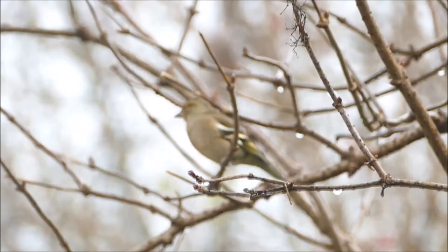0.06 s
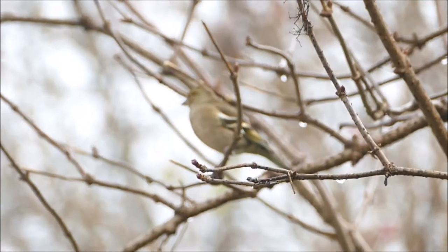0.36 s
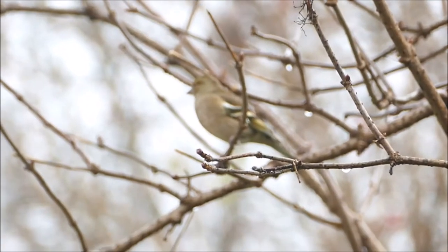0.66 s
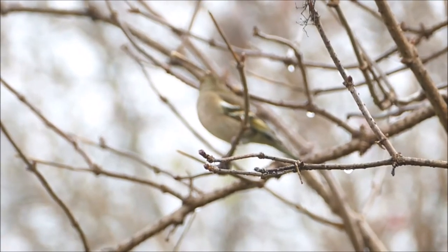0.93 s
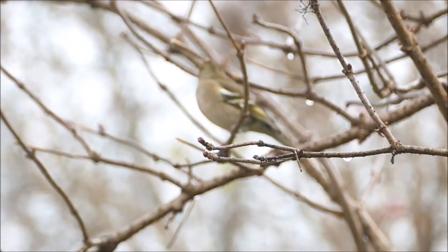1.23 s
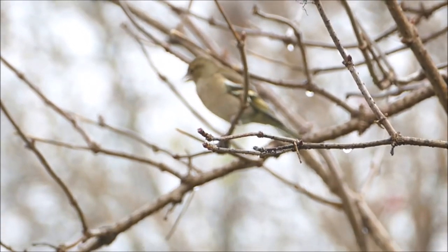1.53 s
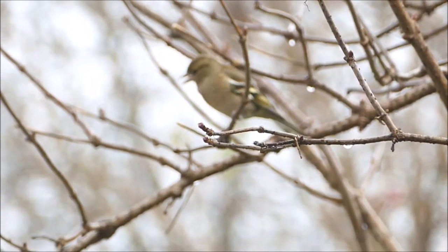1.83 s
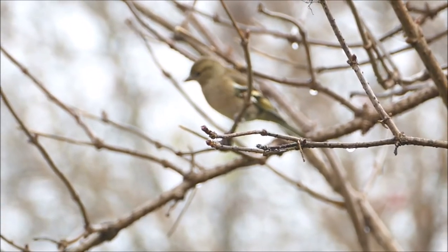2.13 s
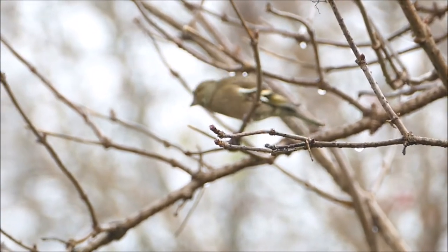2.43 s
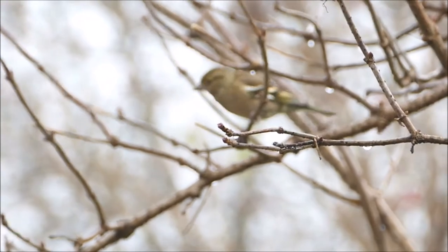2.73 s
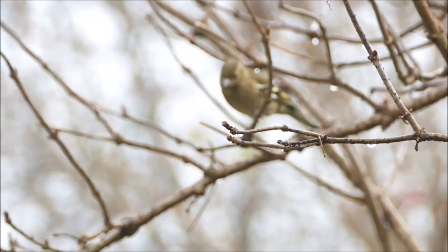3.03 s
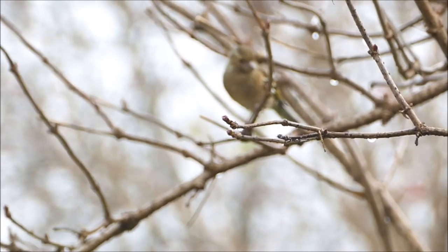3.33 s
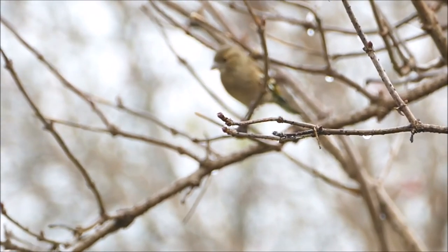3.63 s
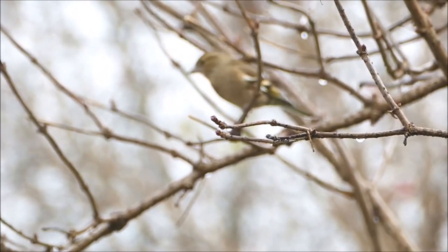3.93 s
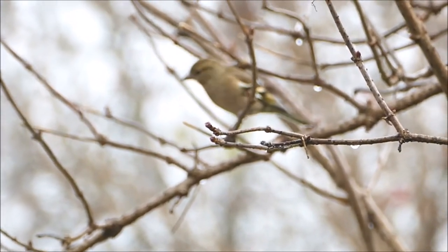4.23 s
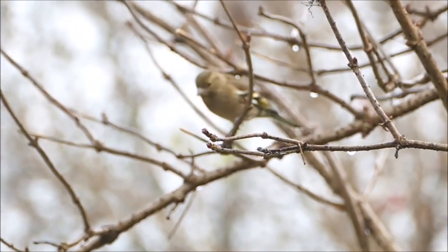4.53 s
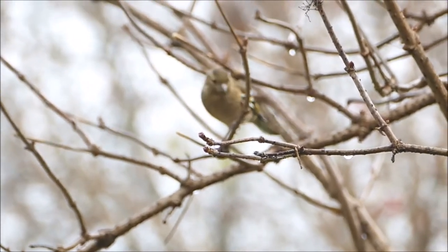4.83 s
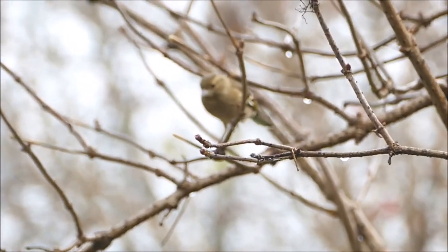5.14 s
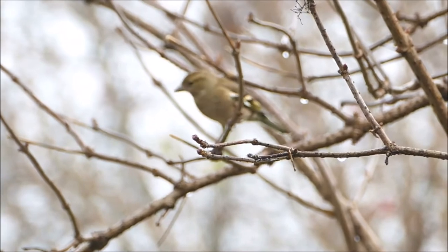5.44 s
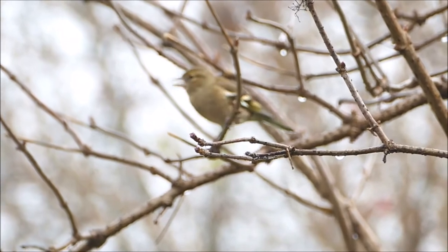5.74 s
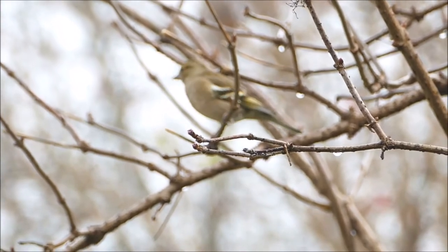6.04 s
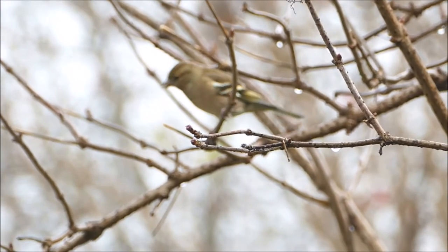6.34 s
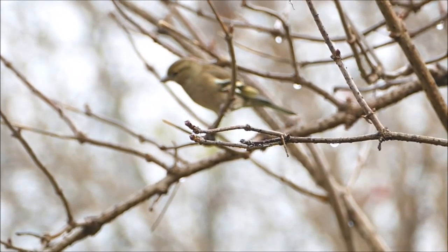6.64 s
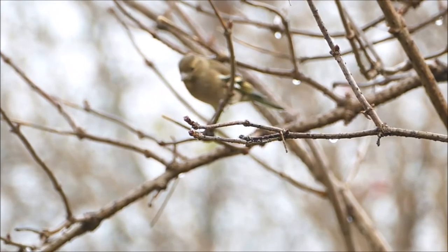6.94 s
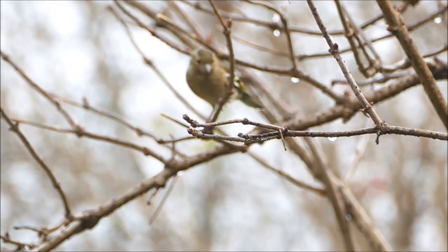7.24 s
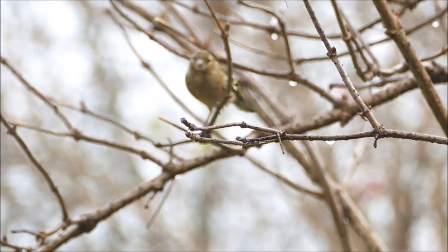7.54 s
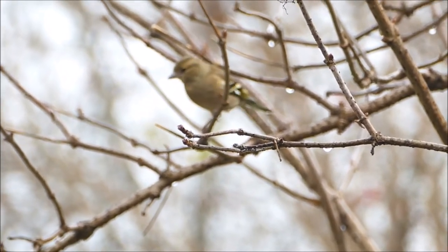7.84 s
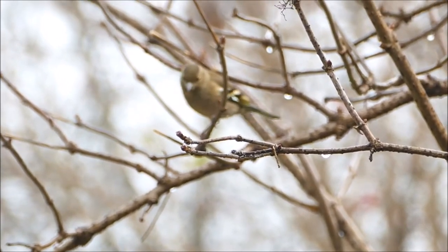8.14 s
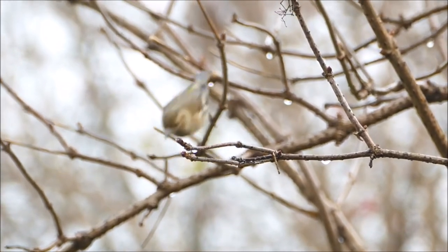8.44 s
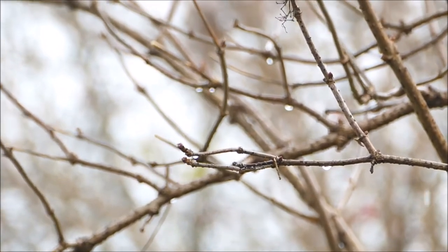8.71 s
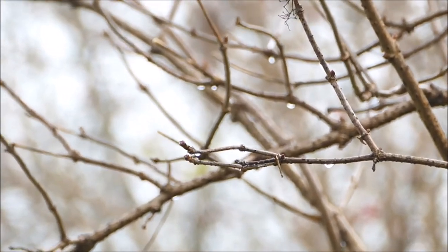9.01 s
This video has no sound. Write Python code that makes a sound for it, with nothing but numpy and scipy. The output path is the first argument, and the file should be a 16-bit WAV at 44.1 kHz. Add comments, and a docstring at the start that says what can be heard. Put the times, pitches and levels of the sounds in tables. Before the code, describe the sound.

After a brief silence, quiet garden ambience cuts in at about 0.3 seconds: distant traffic rumble, a low engine hum and soft microphone hiss, with a faint tone that dies away at once. A nearby finch gives four pairs of short, sharp calls, at roughly 1.7, 3.7, 5.6 and 7.8 seconds, the two notes about a quarter second apart. Each note begins with a rasp and sweeps up into a clear, high whistle with a slight echo. These are by far the loudest sounds. Distant birds chirp faintly in between, around 0.9, 3.1, 5, 6.3, 7.3 and 8.2 seconds. A few water drops tick softly on twigs, near 5 and 6 seconds, in a small cluster around 7, and once more near 8.8. The traffic swells gently now and then and continues to the end.

```python
"""A chaffinch on a bare, wet twig gives four pairs of sharp "pink" calls: in each note its syrinx
starts on a rasp, sweeps up and locks into a clear whistle, shaped by the throat and open beak.
Branches and walls scatter the notes; small birds chirp far off and a few drops tick on the twigs.
Underneath sits a bed of distant traffic, a low engine hum and microphone hiss, with a faint tone
dying away at the start. Loud notes duck the whole mix, which then creeps back up."""
import sys
import numpy as np
from scipy import signal
from scipy.fft import rfft, irfft, next_fast_len
from scipy.io import wavfile
from scipy.ndimage import uniform_filter1d

SR = 44100
rng = np.random.default_rng(int(sys.argv[2]) if len(sys.argv) > 2 else 0)


def unload_audio(sound):
    """Save the sound as a 16-bit wav file, at the path given as the first command line argument."""
    columns = np.transpose(np.atleast_2d(sound))
    # keep every value between -1 and 1, then stretch to whole-number steps
    steps = np.round(np.clip(columns, -1, 1) * 32767)
    wavfile.write(sys.argv[1], SR, steps.astype(np.int16))


N = 399987
T = np.arange(N) / SR

# chaffinch notes, levels before the throat: flip t/s, held f/Hz, drift/(Hz/s), rasp length/s,
# rasp level/dB, accent level/dB, held level/dB, half-pitch mode/dB re rasp, overtones/dB re rasp
PINK_NOTES = [(1.693, 4500, -1800, 0.049, -22.5, -19.5, -22, 4, -7),
              (1.97, 4304, 298, 0.047, -29, -17.5, -21, 8.5, 1.5),
              (3.702, 4370, -1400, 0.048, -22.5, -11.5, -23, 6.5, -7.5),
              (3.9536, 4444, 900, 0.048, -23.5, -17.5, -21, 3.5, 1.5),
              (5.606, 4355, -1200, 0.053, -22, -13.5, -21.5, 5, -4),
              (5.8664, 4328, 1500, 0.051, -23, -22.5, -22, 3.5, -1),
              (7.786, 4396, -1800, 0.051, -21, -12.5, -22, 5.5, -5.5),
              (8.012, 4470, 0, 0.046, -20, -16, -20.5, 3.5, -5)]
# tone colour of the throat and open beak: f/Hz, gain/dB
THROAT_EQ = [(1400, -48), (1800, -16.5), (2300, -14.5), (2850, -9.5), (3600, -3.5), (4350, -6.5),
             (4700, -12.5), (5700, -7), (7000, -11.5), (9000, -21.5), (12500, -33), (14500, -56)]
# sizzle of the beak: f/Hz, relative level/dB
SIZZLE_EQ = [(6000, -10), (9000, -2.5), (12500, 2), (13300, -27), (14200, -17)]
# far chirps: t/s, length/s, start f/Hz, middle f/Hz, end f/Hz, level/dB
FAR_CHIRPS = [(0.909, 0.075, 4300, 3410, 3040, -47), (3.102, 0.077, 4300, 3400, 2490, -45),
              (4.635, 0.019, 3600, 3430, 3180, -51), (4.952, 0.067, 3480, 3720, 3680, -57),
              (5.007, 0.042, 3890, 3360, 2960, -41.5), (6.287, 0.024, 3220, 3460, 4100, -41.5),
              (6.303, 0.023, 3600, 4600, 5200, -46), (6.329, 0.049, 4700, 5650, 6540, -50.5),
              (6.387, 0.04, 3020, 3750, 3890, -41.5), (7.295, 0.06, 4000, 3344, 2870, -44),
              (7.516, 0.03, 2690, 2270, 2250, -57), (8.212, 0.068, 3480, 3190, 3150, -44.5),
              (8.213, 0.03, 2580, 2230, 2100, -49.5)]
# drops: t/s, knock f/Hz, knock width/Hz, knock level/dB, splash f/Hz, splash level/dB,
# thud level/dB, decay/s
DROP_HITS = [(1.875, 3000, 1500, -70, 9000, -49, -75, 0.01), (2.613, 3000, 1500, -70, 7950, -52, -75, 0.01),
             (5.135, 3280, 1500, -50, 6500, -55.5, -50, 0.025),
             (5.953, 3500, 1500, -58, 8900, -40, -72, 0.023),
             (6.891, 2480, 1010, -36, 9850, -41.5, -70, 0.017),
             (6.995, 3220, 1500, -50.5, 10100, -42.5, -63, 0.014),
             (7.133, 2490, 3180, -41, 7000, -52, -43.5, 0.026),
             (8.843, 3300, 1510, -48.5, 8500, -54, -65, 0.017)]
# distant traffic: f/Hz, relative level/dB
TRAFFIC_EQ = [(15, 1), (26, 5), (45, -8), (75, 1), (100, -5.5), (150, -6), (300, -5.5), (600, -8),
              (950, -9), (1400, -16.5), (2200, -24), (4000, -32.5)]
# swells of the traffic rumble: start t/s, end t/s, rise/dB
RUMBLE_SWELLS = [(2.25, 2.45, 4.5), (4.0, 4.2, 5), (6.35, 6.7, 6), (7.85, 8.4, 5)]
# the engine labours and its octave stands out: start t/s, end t/s, rise/dB
ENGINE_LABOUR = [(4.7, 6.05, 10)]
# blur of very distant birds: f/Hz, relative level/dB
CHORUS_EQ = [(2000, -23), (2800, 15.5), (3450, 18), (3850, 18.5), (4200, -31.5), (6000, -52)]
# microphone hiss: f/Hz, relative level/dB
HISS_EQ = [(1000, 0.55), (4500, -0.46), (9000, 1.0), (15500, -2.5)]

START_S, TOP_HZ = 0.257, 15550  # opening silence, high cut
LEAD_S, FLIP_S, HOLD_S = 0.06, 0.0027, 0.049  # a note's run-up, flip softness and hold


def chaffinch():
    """The lead bird shifts on its twig, so every note finds other echoes."""
    out = np.zeros(N)
    for flip_at, *note in PINK_NOTES:
        add(out, flip_at - LEAD_S, garden(pink(*note)))
    return out


def pink(held_hz, drift_hz_per_s, rasp_s, rasp_db, accent_db, held_db, half_db, overtone_db,
         jitter=0.108, flutter=0.7, rolloff=1.64, waver_hz=22, second_db=-13.5, third_db=2,
         breath_db=-15, sizzle_db=-44):
    """One note: the syrinx rasps, every other cycle different, then locks into a clear whistle."""
    t = np.arange(-LEAD_S, 2 * HOLD_S, 1 / SR)
    hz = pink_pitch(t, held_hz + drift_hz_per_s * t + waver_hz * band(0, 120, len(t)))
    rasp, accent, held = pink_envelopes(t, rasp_s, rasp_db, accent_db, held_db)
    half = undb(half_db) * half_pitch_flare(t)
    bloom = held * step(t - 0.0065, FLIP_S)  # the whistle's harmonics open just after the flip
    whistle = {1: accent + held, 2: undb(second_db) * bloom, 3: undb(third_db) * bloom}
    rough = np.clip(-t / rasp_s, 0.085, 1)  # the voice clears as it climbs
    scratch = jitter * rough * undb(overtone_db / 2) * band(0, 1360, len(t))
    phase = 2 * np.pi * np.cumsum(hz * (1 + scratch)) / SR
    voice = 0
    for k in np.arange(2, 13) / 2:  # harmonics, with the half-pitch mode in between
        grit = rasp * (half if k % 1 else 1)
        if k >= 2:
            grit = grit * undb(overtone_db) * (2 / k) ** rolloff
        shake = 1 + flutter * rough * band(0, 1500, len(t))
        throat = response(THROAT_EQ, k * hz) * (k * hz < TOP_HZ)
        voice += (grit + whistle.get(k, 0)) * shake * throat * np.sin(k * phase)
    # turbulence at the syrinx passes through the same throat; a thin sizzle rides on the sweep
    breath = undb(breath_db + overtone_db) * rough * (rasp + accent + held) * coloured(THROAT_EQ, len(t))
    sizzle = undb(sizzle_db + overtone_db / 4) * np.sqrt(rasp + accent) * coloured(SIZZLE_EQ, len(t))
    return np.sqrt(2) * (voice + breath + sizzle)


def pink_pitch(t, held_hz, climb_to_hz=3200, climb_hz_per_s=36000, flip_hz=756, knee_hz=137):
    """The pitch climbs, flips into the upper register at t = 0 and rounds off into the held pitch."""
    sweep = climb_to_hz + climb_hz_per_s * t + flip_hz * step(t, FLIP_S)
    return held_hz - knee_hz * np.logaddexp(0, (held_hz - sweep) / knee_hz)


def pink_envelopes(t, rasp_s, rasp_db, accent_db, held_db,
                   attack_s=0.037, accent_s=0.008, release_db_per_s=480):
    """The rasp swells, the flip gets an accent, the whistle is held and let go."""
    flipped = step(t, FLIP_S)
    rasp = undb(rasp_db) * np.clip((t + rasp_s) / attack_s, 0, 1) ** 0.74 * (1 - flipped)
    accent = undb(accent_db) * np.exp(-(t / accent_s) ** 2)
    held = undb(held_db - release_db_per_s * np.maximum(t - HOLD_S, 0)) * flipped
    return rasp, accent, held


def half_pitch_flare(t, lead_s=0.025, width_s=0.0078, steady_share=0.17):
    """The syrinx's half-pitch mode runs through the rasp and flares shortly before the flip."""
    flare = np.exp(-((t + lead_s) / width_s) ** 2)
    return steady_share * (1 - step(t, FLIP_S)) + (1 - steady_share) * flare


def garden(x, twigs_db=-8, walls_db=-6, trees_db=-19, damp_hz=8000):
    """Direct sound, quick scatter from the branches, and a tail from walls and further trees."""
    twigs = undb(twigs_db) * echoes(0.047, 0.0057)
    walls = undb(walls_db) * echoes(0.52, 0.0037)
    trees = undb(trees_db) * echoes(0.5, 0.092)
    path = signal.sosfilt(signal.butter(1, damp_hz, fs=SR, output="sos"), twigs + walls + trees)
    path[0] += 1  # direct sound
    return signal.fftconvolve(x, path)


def far_birds(faint_db=-62, count=22):
    """Birds in the neighbouring trees, and fainter ones calling at random beyond them."""
    out = np.zeros(N)
    for start, length, *pitches, db in FAR_CHIRPS:
        add(out, start, undb(db) * far_chirp(length, pitches))
    for slot, (offset, pitch) in enumerate(rng.random((count, 2))):
        start = (slot + offset) / count * T[-1]
        hz = 3250 + 400 * pitch
        add(out, start, undb(faint_db) * far_chirp(0.19, [hz + 300, hz, hz - 400]))
    return out


def far_chirp(length_s, pitches, buzz=0.184, wood_db=-1):
    """A slurred whistle, buzzier the wider it sweeps, heard only as scatter and woodland echo."""
    progress = np.linspace(0, 1, int(length_s * SR))
    glide = np.interp(progress, np.linspace(0, 1, len(pitches)), pitches)
    hz = glide + buzz * np.ptp(pitches) * band(0, 830, len(progress))
    whistle = np.sin(np.pi * progress) * np.sin(2 * np.pi * np.cumsum(hz) / SR)
    path = echoes(0.14, 0.003, sparseness=1) + undb(wood_db) * echoes(0.75, 0.04, sparseness=1)
    return signal.fftconvolve(whistle, path)


def drops(attack_s=0.0014, splash_width_hz=4600, thud_hz=350, thud_width_hz=400):
    """Each drop knocks on a twig, with a low thud, and bursts into a short bright spray."""
    out = np.zeros(N)
    t = np.arange(SR // 5) / SR
    for start, knock_hz, knock_width_hz, knock_db, splash_hz, splash_db, thud_db, decay_s in DROP_HITS:
        knock = undb(knock_db) * band(knock_hz, knock_width_hz, len(t))
        splash = undb(splash_db) * band(splash_hz, splash_width_hz, len(t))
        thud = undb(thud_db) * band(thud_hz, thud_width_hz, len(t))
        envelope = (1 - np.exp(-t / attack_s)) * np.exp(-t / decay_s)
        add(out, start, garden((knock + splash + thud) * envelope))
    return out


def traffic(crossover_hz=150, rumble_db=-51, swing_db=1.1, wash_db=-48.5, flicker_db=1.32):
    """Traffic beyond the garden: a swelling rumble under a flickering wash that recedes a little."""
    roar = coloured(TRAFFIC_EQ)
    lows = signal.sosfiltfilt(signal.butter(3, crossover_hz, fs=SR, output="sos"), roar)
    rumble = unit(lows) * undb(rumble_db + swells(RUMBLE_SWELLS) + swing_db * band(0, 8))
    recede_db = 2 * step(T - 2.4, width_s=0.38)
    wash = unit(roar - lows) * undb(wash_db - recede_db + flicker_db * band(0, 15))
    return rumble + wash


def engine(hz=52, wander=0.0278, hum_db=-51.5, octave_db=-61, swing_db=3, whine_hz=580, whine_db=-65):
    """A distant engine: an unsteady low hum, an octave that lifts as it labours, and a thin whine."""
    phase = 2 * np.pi * np.cumsum(hz * (1 + wander * band(0, 12))) / SR
    hum = undb(hum_db + swing_db * band(0, 4.7)) * np.sin(phase)
    octave = undb(octave_db + swells(ENGINE_LABOUR) + swing_db * band(0, 4.7)) * np.sin(2 * phase)
    return hum + octave + undb(whine_db) * band(whine_hz, 15)


def fading_tone(hz=441, waver_hz=4.5, db=-52, fade_db_per_s=42):
    """A faint, low tone that is already dying away as the sound sets in."""
    phase = 2 * np.pi * np.cumsum(hz + waver_hz * band(0, 29)) / SR
    return undb(db - fade_db_per_s * np.maximum(T - START_S, 0)) * np.sin(phase)


def bird_chorus(db=-67, swing_db=0.6):
    """Very distant birds blur into one soft shimmer."""
    return coloured(CHORUS_EQ) * undb(db + swing_db * band(0, 29))


def microphone_hiss(db=-63.5):
    """The microphone's own steady, nearly white noise floor."""
    return coloured(HISS_EQ) * undb(db)


def gain_control(x, threshold_db=-21, recovery_db_per_s=2):
    """A 2:1 compressor: loud notes duck the gain at once, and it creeps back over a few seconds."""
    power = uniform_filter1d(x ** 2, SR // 100)
    level_db = 10 * np.log10(np.abs(power) + 1e-12)
    cut_db = np.maximum(level_db - threshold_db, 0) / 2
    recovery_db = recovery_db_per_s * T
    return x * undb(recovery_db - np.maximum.accumulate(cut_db + recovery_db))


def echoes(t60_s, build_s, sparseness=3):
    """Reflections of unit energy that build and die away; when sparse, a few strong ones stand out."""
    t = np.arange(SR) / SR
    chance = rng.standard_normal(SR)
    envelope = undb(-60 * t / t60_s) * (1 - np.exp(-(t / build_s) ** 2))
    taps = np.sign(chance) * np.abs(chance) ** sparseness * envelope
    return taps / np.linalg.norm(taps)


def band(hz, width_hz, size=N):
    """Noise in one steep resonance; centred on zero it is a random wobble."""
    return shaped_noise(lambda f: 1 / (1 + (2 * (f - hz) / width_hz) ** 2), size)


def coloured(eq, size=N):
    """Noise through an EQ curve."""
    return shaped_noise(lambda f: response(eq, f), size)


def shaped_noise(gain_at, size):
    """Noise of unit rms, its spectrum shaped by a function of frequency."""
    padded = next_fast_len(size, True)
    spectrum = rfft(rng.standard_normal(padded)) * gain_at(np.fft.rfftfreq(padded, 1 / SR))
    return unit(irfft(spectrum, padded)[:size])


def response(eq, hz):
    """Gain of an EQ curve (f/Hz, level/dB) at the given frequencies."""
    f, db = np.transpose(eq)
    return undb(np.interp(np.log(hz + 1), np.log(f), db))


def swells(table, edge_s=0.037):
    """A fader ride in dB from rows of start t/s, end t/s, rise/dB."""
    return sum(db * step(T - start, edge_s) * step(end - T, edge_s) for start, end, db in table)


def step(t, width_s):
    """A smooth fade from 0 to 1 around t = 0."""
    return (1 + np.tanh(t / width_s / 2)) / 2


def undb(db):
    """Decibels to gain."""
    return 10 ** (np.asarray(db) / 20)


def unit(x):
    """Scale to an rms of one."""
    return x / np.sqrt(np.mean(x ** 2))


def add(out, start_s, x):
    """Mix x into out from start_s on."""
    i = int(start_s * SR)
    out[i:i + len(x)] += x[:len(out) - i]


def scene():
    """The mono mix: chaffinch up front, far birds and drops behind it, the bed underneath."""
    events = chaffinch() + far_birds() + drops()
    bed = traffic() + bird_chorus() + microphone_hiss() + engine() + fading_tone()
    return (events + bed)[None]


def record(dry):
    """The mix cuts in after a short silence, then passes the compressor and a steep high cut."""
    compressed = gain_control(dry[0] * (T >= START_S))
    high_cut = signal.ellip(12, 0.1, 90, TOP_HZ, fs=SR, output="sos")
    return signal.sosfilt(high_cut, compressed)[None]


dry = scene()
out = record(dry)
unload_audio(out)
```